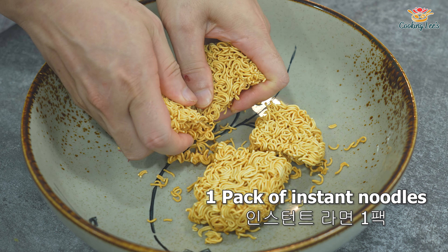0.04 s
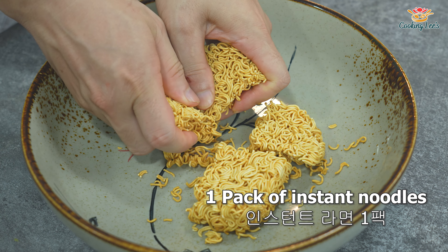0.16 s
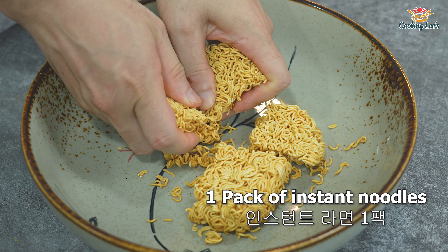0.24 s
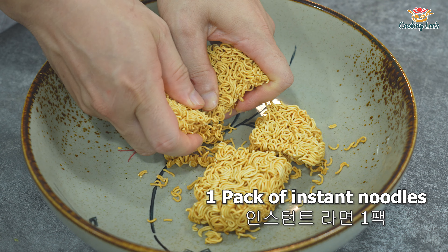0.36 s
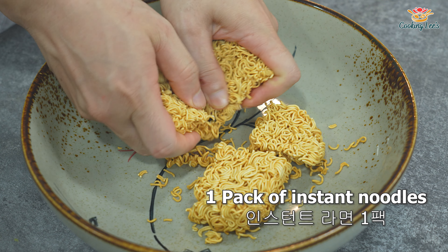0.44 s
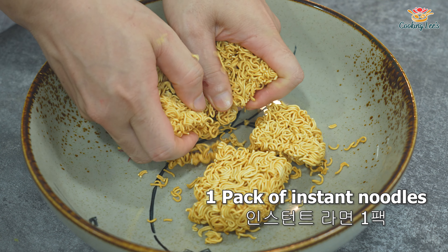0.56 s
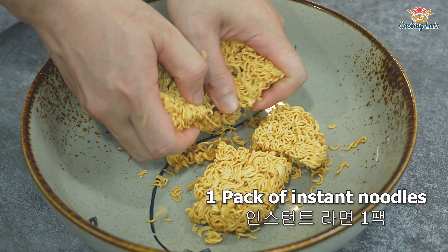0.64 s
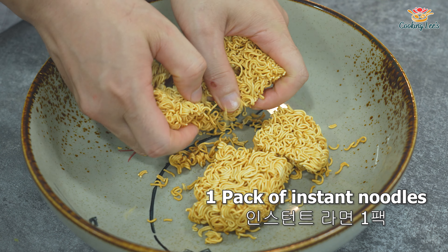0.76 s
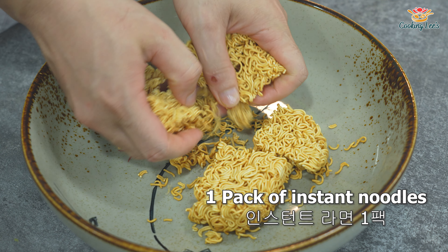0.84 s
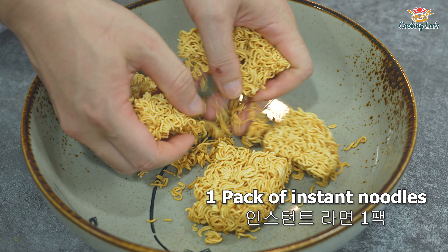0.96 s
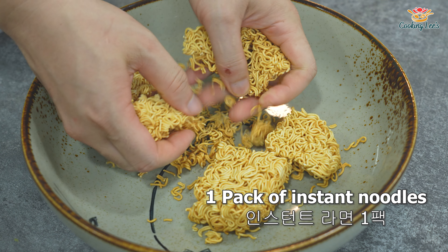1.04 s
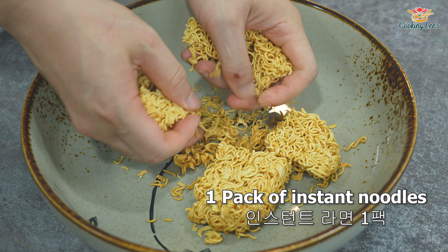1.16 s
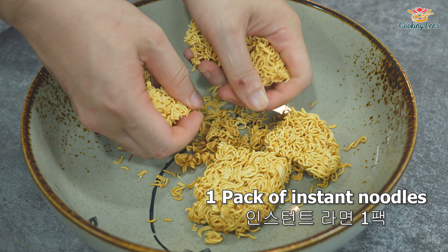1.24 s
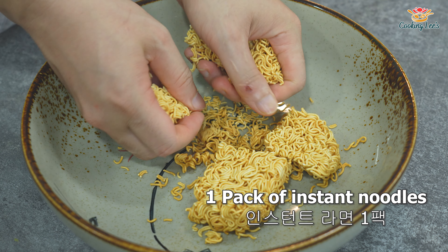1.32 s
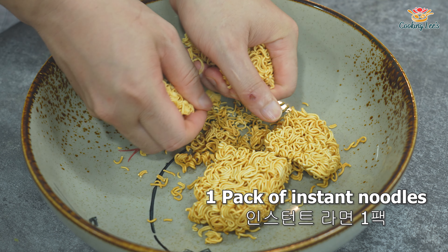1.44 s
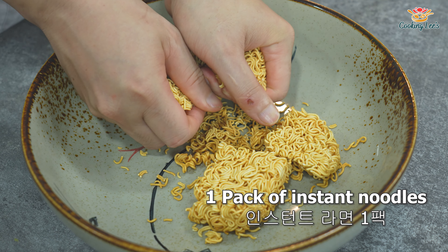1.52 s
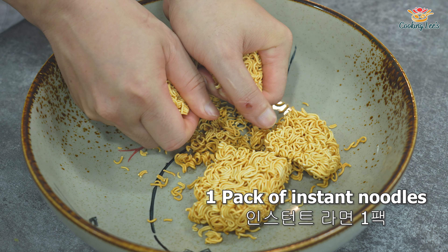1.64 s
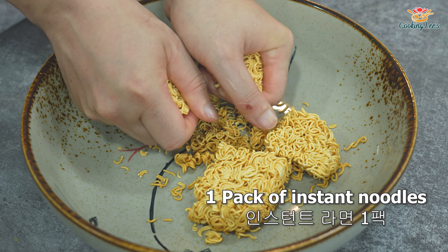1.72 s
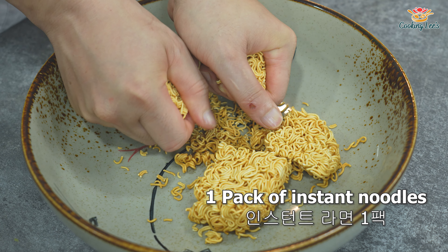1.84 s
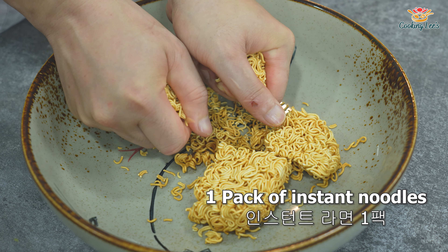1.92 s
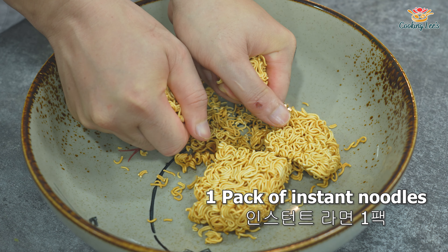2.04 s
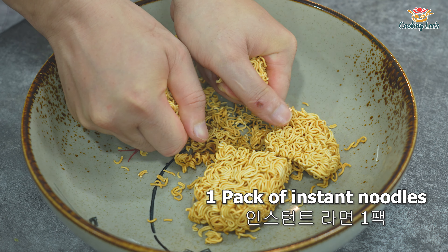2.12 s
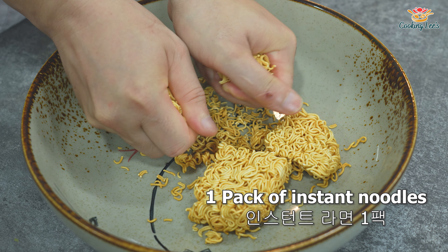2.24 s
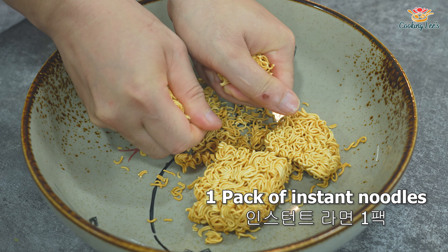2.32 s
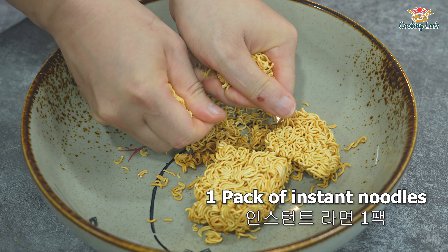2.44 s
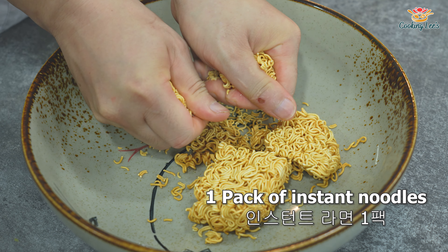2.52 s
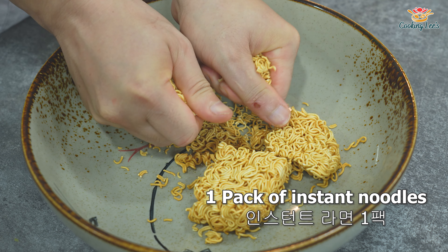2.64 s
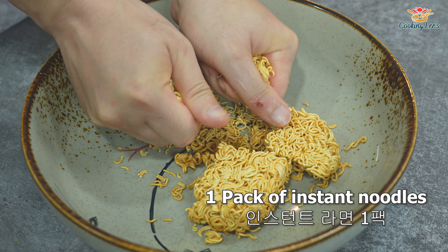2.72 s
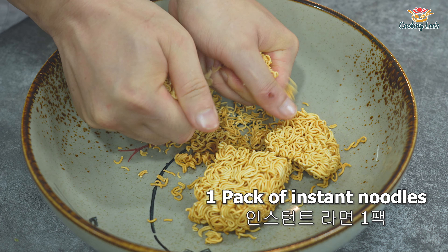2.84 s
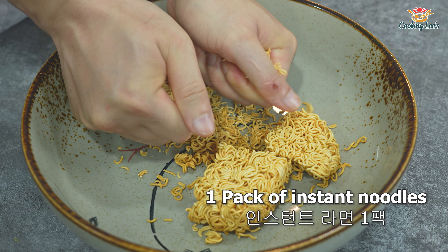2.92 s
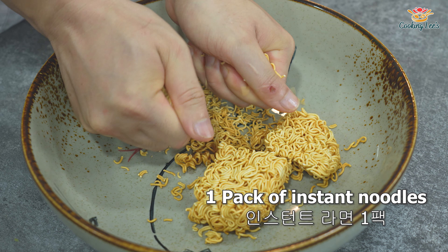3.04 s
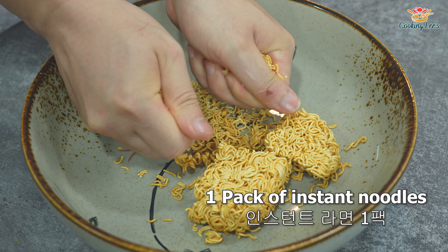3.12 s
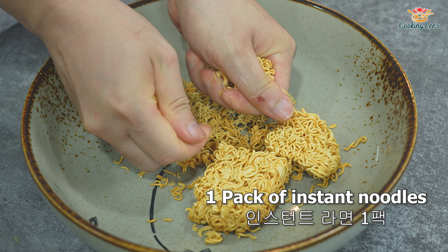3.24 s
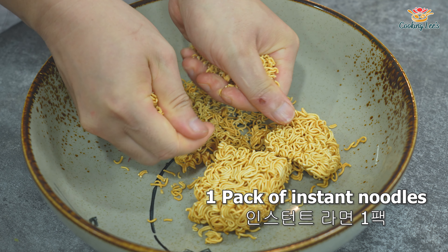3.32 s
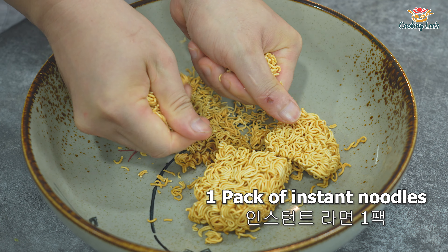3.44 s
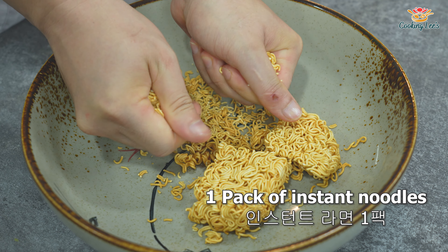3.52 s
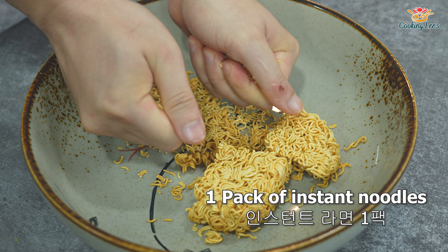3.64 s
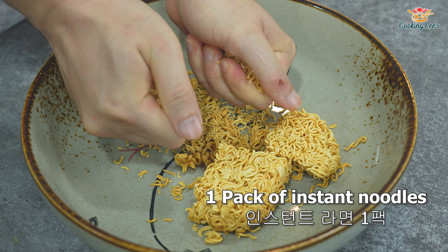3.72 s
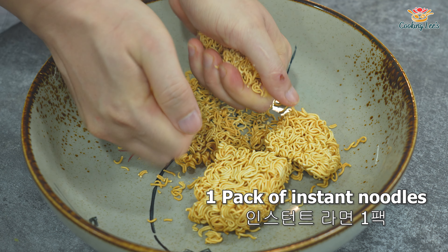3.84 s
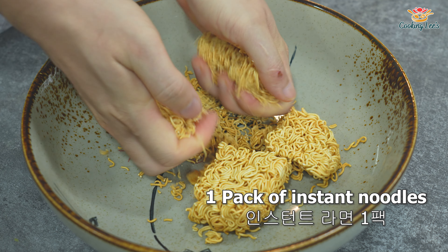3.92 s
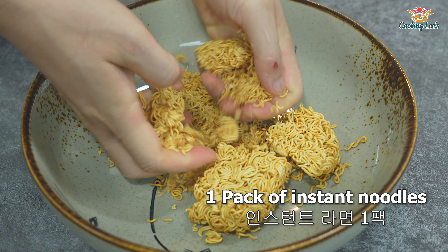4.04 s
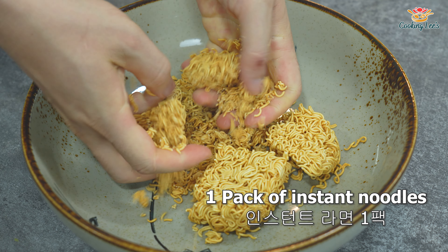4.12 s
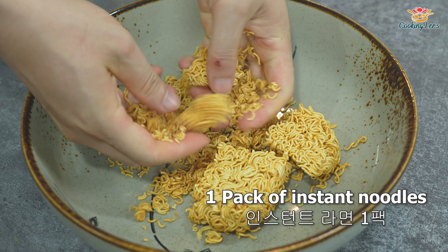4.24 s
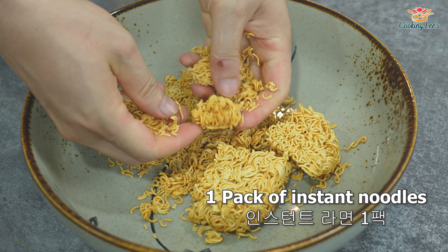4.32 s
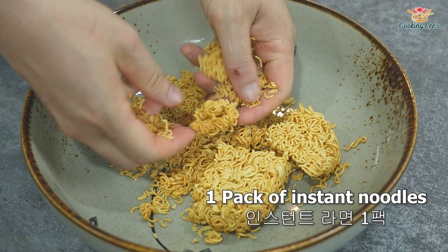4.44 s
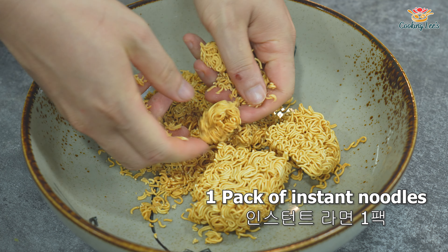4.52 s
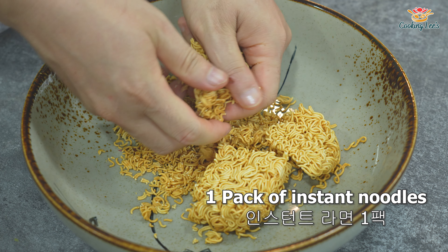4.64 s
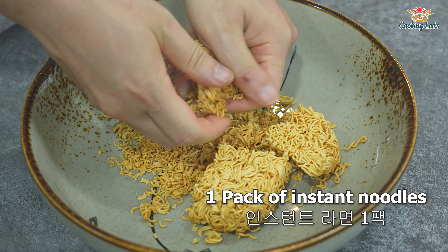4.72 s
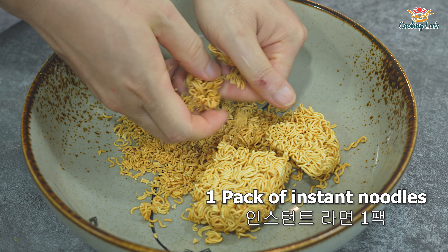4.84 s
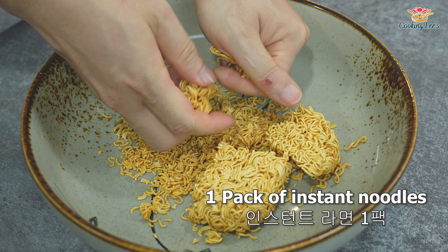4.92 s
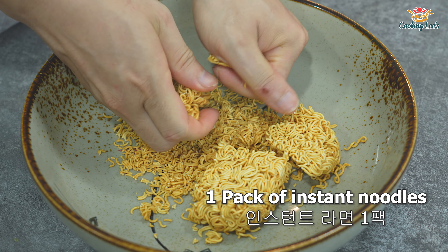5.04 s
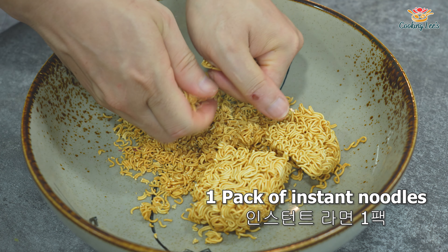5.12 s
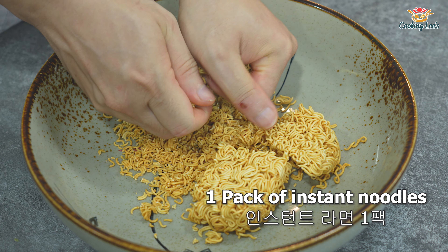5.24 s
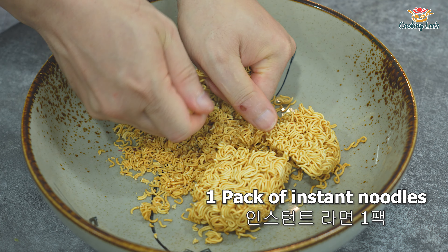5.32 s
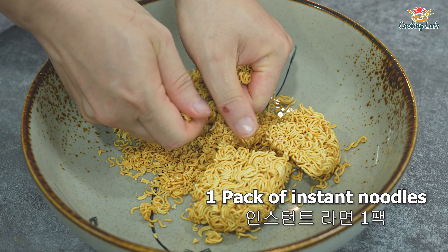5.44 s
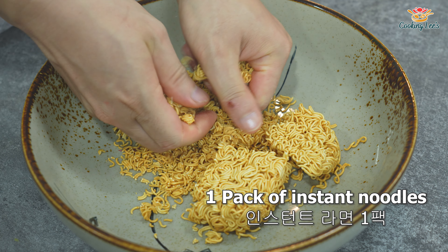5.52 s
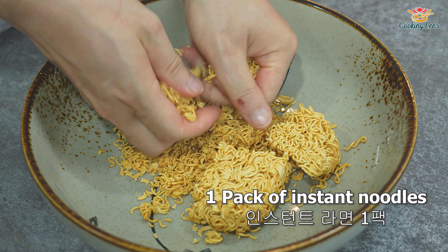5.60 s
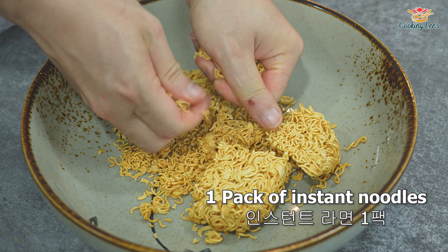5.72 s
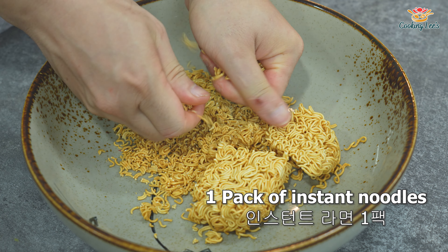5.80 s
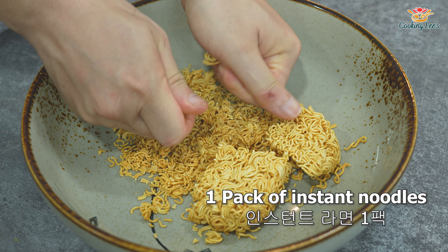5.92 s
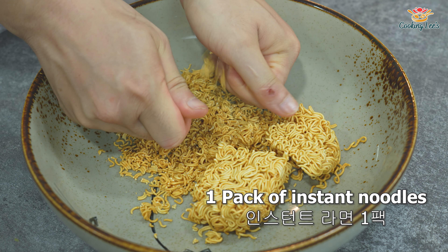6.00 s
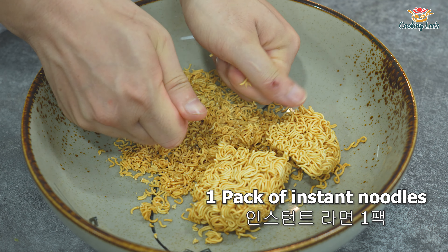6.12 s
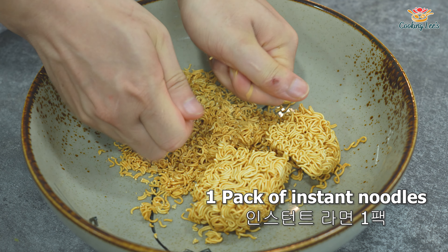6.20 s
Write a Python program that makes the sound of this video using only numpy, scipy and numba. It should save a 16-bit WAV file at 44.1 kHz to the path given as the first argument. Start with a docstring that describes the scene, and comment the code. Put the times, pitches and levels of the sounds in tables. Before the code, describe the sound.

A close microphone in a small kitchen hears hands crushing dry noodles over a ceramic bowl. At 0 s a soft bump comes with bright, sharp snaps and scattered crumbs, crackling until about 0.55 s. From 0.6 to 1.2 s it is sparser: small pieces clink on the bowl, clearest at 0.95 and 1.13 s, with a dull bump at 0.9 s. Crunching resumes near 1.25 s, thickening from 1.6 s into rapid, hollow, fist-muffled squeezes with irregular loud cracks, the strongest at 3.6 s. At 3.95 s a hard, short knock of bowl on counter rings low while crumbs spill. From 4.1 to 4.9 s only thin rustle, ticking crumbs and faint crackles remain. Crunching returns around 5 s, with a sharp snap at 5.35 s, a faint low thump at 5.65 s, and dense, brittle crushing from 5.75 s, still going at 6.3 s.

```python
"""First comes a soft bump with bright snaps: two hands crush dry instant noodles over a wide ceramic bowl, up close.
Strands break in avalanches of noise grains, coloured bright in the open air and hollow by the resonances of the fists.
Falling crumbs and larger pieces excite the decaying modes of the bowl, and loose strands hiss throughout.
The hands bump the bowl against the counter and lean on it, which sounds the counter's low modes in a small kitchen."""
import sys
import numpy as np
from scipy import signal
from scipy.fft import rfft, irfft
from scipy.io import wavfile
from scipy.ndimage import uniform_filter1d, minimum_filter1d
from numba import njit

SR = 44100
rng = np.random.default_rng(int(sys.argv[2]) if len(sys.argv) > 2 else 0)


def unload_wav(signal):
    """Save mono or channel-first audio to the path in sys.argv[1] as 16-bit WAV at rate SR, clipped to [-1, 1]."""
    wavfile.write(
        sys.argv[1],
        SR,
        np.round(np.clip(np.atleast_2d(signal).T, -1, 1) * 32767).astype(np.int16),
    )


N = 276507


def undb(db):
    """Level to amplitude: 20 dB is a factor of ten."""
    return 10 ** (np.asarray(db) / 20)


def curves(table):
    """Linear interpolation: each column after the time becomes one value per sample."""
    s, *columns = np.transpose(table)
    return [np.interp(np.arange(N) / SR, s, column) for column in columns]


def unit(x):
    """Power normalisation: scale to rms 1."""
    return x / np.sqrt(np.mean(x ** 2) + 1e-20)


def even(x, size):
    """Short-time power normalisation: rms 1 over every stretch of size samples, keeping the finer grain."""
    power = uniform_filter1d(uniform_filter1d(x ** 2, size), size)
    return x / np.sqrt(np.abs(power) + 1e-12)


def add(track, s, sound):
    """Superposition: mix a sound into a track at a time in seconds."""
    i = int(np.clip(s * SR, 0, N - 1))
    track[i:i + len(sound)] += sound[:N - i]


def fade(t, t60):
    """Exponential decay of a damped system: 60 dB down after t60 seconds."""
    return np.exp(-np.log(1000) * t / t60)


def damped_mode(t, hz, t60):
    """Free vibration of one mode: a sine that decays exponentially."""
    return np.sin(2 * np.pi * hz * t) * fade(t, t60)


def passband(x, hz, kind, order=2):
    """Butterworth filter: a maximally flat passband."""
    return signal.sosfilt(signal.butter(order, hz, kind, fs=SR, output="sos"), x)


def colour(x, points, size=1024):
    """Minimum-phase filter of unit power: the cepstrum turns (Hz, dB) points into a causal response."""
    hz, db = np.transpose(points)
    bins = np.maximum(np.fft.rfftfreq(size, 1 / SR), 1)
    magnitude = undb(np.interp(np.log(bins), np.log(hz), db))
    cepstrum = irfft(np.log(magnitude))
    causal_cepstrum = np.r_[0, 2 * cepstrum[1:size // 2]]
    response = irfft(np.exp(rfft(causal_cepstrum, size)))
    return signal.fftconvolve(x, response / np.linalg.norm(response))[:N]


@njit
def resonance(x, hz, width):
    """Second-order resonator: a state-variable band-pass whose centre may move."""
    y, band, low = np.empty(len(x)), 0., 0.
    for i in range(len(x)):
        g, damping = np.tan(np.pi * hz[i] / SR), width / hz[i]
        v = (band + g * (x[i] - low)) / (1 + g * (g + damping))
        band, low, y[i] = 2 * v - band, low + 2 * g * v, damping * v
    return y


def clicks(rate, spread_db):
    """Poisson-like impacts: impulses at random moments (rate per second), their levels spread normally."""
    happens = rng.random(N) < rate / SR
    return happens * undb(spread_db * np.clip(rng.standard_normal(N), -2, 2))


def efforts(table, attack_s, release_s, rest_db):
    """Envelope of a row of movements: each builds, holds and dies away exponentially, over a resting level."""
    t, gain = np.arange(N) / SR, np.full(N, undb(rest_db))
    for s, length, db in table:
        build = np.clip((t - s) / attack_s + .5, 0, 1)
        release = np.exp(-np.maximum(t - s - length, 0) / release_s)
        gain = np.maximum(gain, undb(db) * build * release)
    return gain


def kitchen(x, wet_db=-16, dull_hz=6000, t60=.27):
    """Diffuse reverberation: convolution with decaying noise adds the soft reflections of a small room."""
    t = np.arange(SR // 2) / SR
    reflections = rng.standard_normal(len(t)) * fade(t, t60) * (t > .005)
    tail = passband(reflections, dull_hz, "lowpass", order=1)
    return x + undb(wet_db) * signal.fftconvolve(x, tail / np.linalg.norm(tail))[:N]


# the hands lean on the bowl and the counter rumbles: (start [s], length [s], level [dB])
LEANS = [(0, 0.28, -60), (3.2, 1, -66), (4.2, 0.39, -61), (5.12, .45, -72), (5.62, 0.12, -55.5),
         (5.8, 0.27, -65)]
# the weight comes on and off; the counter is never quite still
LEAN_S, LIFT_S, STILL_DB = 0.045, 0.045, -99
# modes of the counter under the bowl, for rumble and bumps: (frequency [Hz], level [dB], t60 [s])
COUNTER_MODES = [(68.3, -23, 0.45), (121.4, -4.5, 0.31), (181, -3.5, 0.55), (298, -10.5, 0.56),
                 (453, -11.5, 0.27), (502, -8.5, 0.29), (670, -18, 0.95), (786, -14.5, 0.68),
                 (910, -12.5, 0.42)]


def rumble(width_hz=20.0):
    """Forced vibration: shifting pressure, as noise, stirs the lowest mode of the counter."""
    hz = np.full(N, 1. * COUNTER_MODES[0][0])
    sway = resonance(rng.standard_normal(N), hz, width_hz)
    sway = resonance(sway, hz, width_hz)
    return even(sway, size=6000) * efforts(LEANS, LEAN_S, LIFT_S, STILL_DB)


# the bowl is bumped against the counter:
# (time [s], level [dB], brightness as low-pass cutoff [Hz], softness of the push [s])
BUMPS = [(0.0, -23.5, 800, 0.0015), (0.671, -46, 500, 0.012), (0.889, -24, 1100, 0.0058),
         (1.387, -35.5, 152, 0.015), (3.948, -11, 740, 0.00042), (3.954, -30, 402, 0.00074),
         (4.451, -39.5, 142, 0.011), (5.173, -50, 300, .005), (5.656, -27, 140, 0.011)]


def bumps(thud_hz=175, thud_t60=0.013, knock_hz=580, knock_t60=0.016, knock_db=-5,
          ring_db=-14, boom_db=-24, boom_t60=0.69, lowest_hz=60):
    """Impact excitation: a dull thud and short knock, the counter's modes, and the low boom of the kitchen."""
    t, out = np.arange(SR) / SR, np.zeros(N)
    thud = damped_mode(t, thud_hz, thud_t60)
    knock = undb(knock_db) * damped_mode(t, knock_hz, knock_t60)
    # neighbouring modes start in opposite phase
    ring = sum((-1) ** k * undb(db) * damped_mode(t, hz, t60)
               for k, (hz, db, t60) in enumerate(COUNTER_MODES))
    for s, db, bright_hz, soft_s in BUMPS:
        boom_noise = passband(rng.standard_normal(SR), [125, 380], "bandpass", order=1)
        boom = unit(boom_noise) * fade(t, boom_t60)
        push = 1 - np.exp(-t / soft_s)
        blow = (thud + knock + undb(ring_db) * ring + undb(boom_db) * boom) * push
        add(out, s, undb(db) * passband(blow, bright_hz, "lowpass"))
    return passband(out, lowest_hz, "highpass", order=3)


# modes of the loaded bowl, for crumbs and clinks: (frequency [Hz], level [dB], t60 [s])
BOWL_MODES = [(2140, 0, .12), (2215, -5, .06), (3535, -1, .14), (3620, -10, .06), (5095, -16, .18),
              (5695, -12, .15), (6870, -14, .18), (7675, -11, .15), (9160, -14, .15), (9620, -12, .1),
              (10220, -16, .12), (11120, -12, .13), (13950, -14, .05)]
# the handful drops; from then on it smothers the second pair of the bowl's modes
HEAP_S, SMOTHER_DB = 3.95, -6
# colour of a crumb landing: (frequency [Hz], level [dB])
TICK_COLOUR = [(300, -54), (800, -8), (1100, -22), (1800, 0.5), (2300, 12), (2700, 2.5), (3050, -7),
               (4300, -25), (7000, -41), (12000, -25), (15500, -3)]
# spills of crumbs onto the glaze: (start [s], length [s], level [dB])
SPILLS = [(0, 0.011, -35.5), (.15, 0.14, -35.5), (.61, 0.39, -38.5), (.96, 0.13, -37), (1.13, 0.083, -36),
          (2.8, 1.1, -40), (3.95, .2, -33.5), (4.15, .12, -38), (4.44, 0.11, -41.5), (4.65, 0.031, -40),
          (4.85, 0.053, -37.5), (5.5, 0.89, -40.5)]
# a spill builds and trickles out; stray crumbs fall all the time
POUR_S, TRICKLE_S, STRAY_DB = 0.012, 0.051, -44


def crumbs(rate=170, spread_db=6, tick_db=-4):
    """Modal excitation by position: each crumb ticks and, on another spot of the bowl, weights the modes anew."""
    t = np.arange(SR // 3) / SR
    hits, ring = clicks(rate, spread_db), 0
    smothered_db = SMOTHER_DB * (np.arange(N) / SR > HEAP_S)
    for k, (hz, db, t60) in enumerate(BOWL_MODES):
        mode_db = db + smothered_db * (k // 2 == 1)
        strikes = hits * rng.standard_normal(N)
        mode_ring = signal.fftconvolve(strikes, damped_mode(t, hz, t60))[:N]
        ring = ring + undb(mode_db) * even(mode_ring, size=3000)
    # many further crumbs tick without a ring
    ticks = colour(even(hits + clicks(4 * rate, spread_db), size=1500), TICK_COLOUR)
    # the stiff glaze radiates little below its lowest mode
    patter = passband(unit(ring) + undb(tick_db) * ticks, 1150, "highpass", order=3)
    return patter * efforts(SPILLS, POUR_S, TRICKLE_S, STRAY_DB)


# larger pieces hit the bowl, which a hand damps:
# (time [s], relative peak level [dB], upper pair of modes against the lower [dB])
CLINKS = [(0.1075, -24, -4), (0.1935, -20, -4), (0.5958, -23, -13), (0.603, -20, -15), (0.6698, -25, -4),
          (0.7147, -23, -10), (0.9522, -6, -23), (1.1285, -9, -12), (1.1625, -17, -12), (1.1802, -14, -16)]


def clinks(damped_t60=0.07, stiffen=1.014, second_db=-15, lowest_hz=1550, tap_db=1.0):
    """Damped modal ring: hard taps near a holding hand sound the two lowest pairs of modes, raised and short."""
    t, out = np.arange(SR // 5) / SR, np.zeros(N)
    low, low_twin, high, high_twin = (np.sin(2 * np.pi * hz * stiffen * t) for hz, _, _ in BOWL_MODES[:4])
    lower_pair = low + undb(second_db) * low_twin
    upper_pair = high + undb(second_db) * high_twin
    for s, db, upper_db in CLINKS:
        ring = lower_pair + undb(upper_db) * upper_pair
        add(out, s, undb(db + tap_db) * ring / np.abs(ring).max() * fade(t, damped_t60))
    return passband(out, lowest_hz, "highpass", order=5)


def crackle(rate=600, spread_db=2.5, avalanche_s=0.0019, rub=0.054, flurry_db=2.5):
    """Avalanche noise: small fractures, each a short run of grains, come in flurries over the rub of strands."""
    t = np.arange(SR // 50) / SR
    avalanche_power = np.exp(-2 * t / avalanche_s)
    power = signal.fftconvolve(clicks(rate, spread_db) ** 2, avalanche_power)[:N]
    strength = even(np.sqrt(np.abs(power)) + 1e-4, size=900) + rub
    flurry = unit(uniform_filter1d(rng.standard_normal(N), size=900))
    grains = even(strength * rng.standard_normal(N), size=800)
    return grains * unit(undb(flurry_db * flurry))


# colour of a breaking strand in the open, for rustle and noodles: (frequency [Hz], level [dB])
CRACK_COLOUR = [(250, -63), (420, -27.5), (600, -11.5), (830, -15.5), (1000, -18), (1180, -2.5), (1450, -5),
                (1900, -20), (2600, 2), (3700, 3), (4500, -2.5), (7000, 1.5), (11000, 1.5), (15500, 0)]


def rustle(level_db=-43.0, lowest_hz=3800):
    """Friction noise: loose strands slide over each other and the skin all the time, a thin hiss of tiny grains."""
    grains = colour(crackle(rate=500, spread_db=8.5, rub=.15, flurry_db=3.0), CRACK_COLOUR)
    return undb(level_db) * passband(grains, lowest_hz, "highpass")


def shares(closure_db):
    """Energy conservation: split a crack between the open air and the inside of the fist."""
    ratio = undb(closure_db)
    return np.array([np.ones_like(ratio), ratio]) / np.hypot(1, ratio)


def lesser_snaps(effort, count=240, length_s=0.0035, length_spread=0.51, over_db=3.5, spread_db=2.5,
                 depth_spread_db=3):
    """Successive brittle failure: strands give way at uneven moments, as loud as the squeeze is hard."""
    when = (np.arange(count) + rng.random(count)) / count * (N - 1)
    length, size, depth = np.clip(rng.standard_normal((count, 3)), -2, 2).T
    db = 20 * np.log10(effort[when.astype(int)]) + over_db + spread_db * size
    lengths_s = length_s * np.exp(length_spread * length)
    return list(zip(when / SR, lengths_s, db, depth_spread_db * depth))  # columns as in LOUD_SNAPS


MUFFLE_PER_DEPTH = 0.73  # dB of closure gained for each dB of depth


def snaps(rows, closure_db, steep=6):
    """Brittle fracture bursts swell and die in ms; returns the open cracks, those in the fist, and their depth."""
    grains = rng.standard_normal(N)
    body = signal.butter(2, [950, 2100], "bandpass", fs=SR, output="sos")
    body_share = np.std(signal.sosfilt(body, grains))
    outside, inside, depth = np.zeros((3, N))
    for s, length, db, depth_db in rows:
        i, n = int(s * SR), max(int(length * SR), 20)
        age = np.linspace(0, steep, n)
        burst = grains[i:i + n] * (age * np.exp(-age))[:N - i]
        # the middle band of a burst sets how strongly it drives the air in the fist
        body_burst = signal.sosfilt(body, np.pad(burst, (0, n)))
        body_rms = np.linalg.norm(body_burst) / np.sqrt(n) + 1e-12
        open_gain, fist_gain = undb(db) * shares(closure_db[i] + MUFFLE_PER_DEPTH * depth_db)
        add(outside, s, open_gain * unit(burst))
        add(inside, s, fist_gain * burst * body_share / body_rms)
        depth[i:i + n] = depth_db
    return outside, inside, depth


# the cavity of the fists changes with the grip: (time [s], middle resonance [Hz], upper resonance [Hz])
GRIP = [(0, 2130, 3770), (1.55, 2245, 3900), (2.4, 2030, 3540), (2.72, 1900, 3660), (3.25, 2120, 3570),
        (3.6, 1900, 3460), (3.9, 2230, 3670), (5, 2180, 3800), (5.3, 1845, 3790), (5.63, 2290, 3740),
        (5.8, 1840, 3850), (6, 2040, 4040), (6.27, 2080, 3500)]
# how strongly the cupped hands ring, against their middle resonance:
# (time [s], deep resonances [dB], upper resonance [dB])
CUP = [(0, 7, 9.5), (1.45, -4, -7.5), (2.35, 2.5, 3), (2.7, 2.5, -2), (3.1, 3, -1), (3.35, -2.5, 5.5),
       (3.54, 3, -1), (3.83, -0.5, 1.5), (3.93, -6.5, 0.5), (5.1, -5.5, -12.5), (5.84, -8.5, -5.5),
       (5.92, -2, -1), (6.03, -8.5, -5), (6.13, -2, 1.5), (6.27, -8, -1)]
# deep resonances of the air between hands and bowl: (frequency [Hz], width [Hz], level [dB])
HOLLOW = [(554, 172, -14.5), (819.5, 303, -6), (1231, 264, 4.5), (1526, 249, 4.5)]


def fist(x, depth_db, middle_db=0, middle_width=285.0, upper_db=0, upper_width=385.0, edge_hz=4250, leak_hz=400):
    """Cavity resonance: the air in cupped hands shares a crack's energy; flesh eats treble, gaps leak bass."""
    middle_hz, upper_hz = curves(GRIP)
    cup_deep_db, cup_upper_db = curves(CUP)
    share = undb([cup_deep_db + depth_db, np.full(N, middle_db), cup_upper_db + upper_db - depth_db])
    share = share / np.linalg.norm(share, axis=0)
    to_deep, to_middle, to_upper = share * x + 1e-18
    deep = sum((-1) ** k * undb(db) * resonance(to_deep, np.full(N, 1. * hz), 1. * width)
               for k, (hz, width, db) in enumerate(HOLLOW))
    middle = resonance(to_middle, middle_hz, middle_width)
    upper = resonance(to_upper, upper_hz, upper_width)
    # each resonance gives back the power it was fed
    air = unit(deep) * np.std(to_deep) + unit(middle) * np.std(to_middle) - unit(upper) * np.std(to_upper)
    muffled = passband(air, edge_hz, "lowpass", order=4)
    muffled = passband(muffled, leak_hz, "highpass", order=4)
    return unit(muffled) * np.std(x)


# each squeeze of the fingers: (start [s], length [s], level [dB])
SQUEEZES = [(0, 0.098, -33), (.105, 0.07, -26.5), (.255, 0.019, -30), (.31, 0.23, -27.5),
            (.635, 0.084, -34), (1.09, .13, -34), (1.25, .2, -31.5), (1.475, 0.14, -28.5),
            (1.59, 0.18, -24), (1.82, 0.14, -22.5), (1.95, 0.095, -29.5), (2.065, 0.23, -25.5),
            (2.31, 0.13, -27), (2.47, 0.15, -24.5), (2.56, 0.28, -23), (2.88, 0.37, -27),
            (3.19, .14, -24.5), (3.35, 0.073, -30.5), (3.445, 0.18, -26.5), (3.675, 0.1, -27),
            (3.835, .13, -28.5), (3.99, 0.2, -36), (4.2, 0.12, -42.5), (4.39, 0.026, -35),
            (4.85, 0.09, -41), (4.98, 0.064, -36), (5.06, .08, -27), (5.175, 0.09, -26), (5.3, 0.11, -30.5),
            (5.42, 0.093, -37.5), (5.53, .2, -31.5), (5.595, 0.024, -29.5), (5.75, 0.21, -30),
            (5.925, .15, -23.5), (6.105, 0.085, -21.5), (6.23, 0.059, -28)]
# a squeeze builds and lets go; merely held, the noodles hardly crack
PRESS_S, RELAX_S, HOLD_DB = 0.0074, 0.034, -48.5
# how far the fists close round the noodles: (time [s], sound from inside the fist over the open crack [dB])
CLOSURE = [(0, -7), (.14, -22.5), (.45, -15), (.75, -12), (1.2, -13.5), (1.43, -9), (1.5, -2.5),
           (1.95, 3.5), (2.5, 1.5), (2.85, 8), (3.25, 1.5), (3.6, 7), (3.9, 4.5), (4.07, -11), (4.85, -21),
           (5.02, 1.5), (5.62, 1), (6.27, 11.5)]
# the loudest fractures:
# (time [s], length [s], level [dB], depth in the fist: deep resonances up and upper one down [dB])
LOUD_SNAPS = [(0.047, 0.0023, -16.5, -10), (.0771, 0.0033, -20, -9), (0.114, 0.0072, -21, 0),
              (0.1283, 0.025, -22.5, 0), (0.2666, 0.005, -22, 2), (0.3186, 0.0027, -29, -7),
              (0.358, 0.0028, -21.5, -6), (0.3783, 0.0027, -19, -3), (0.417, 0.0026, -24.5, 4),
              (0.4446, 0.0085, -15, -4), (0.639, 0.0016, -23.5, -7), (0.681, .004, -21, 1.5),
              (1.294, .0025, -20, -3), (1.3354, 0.0083, -23.5, 0), (1.3747, 0.0069, -22, -1),
              (1.4157, 0.0058, -22, -3), (1.444, 0.0053, -24.5, 1), (1.4787, 0.0056, -20, -1),
              (1.4949, 0.0047, -19, -2), (1.523, 0.014, -26, 3.5), (1.5594, 0.0063, -19, -7),
              (1.771, .005, -13.5, -0.5), (1.8166, 0.0063, -20, -3.5), (1.8426, 0.0039, -17, -2),
              (1.868, .005, -22.5, 1), (2.0186, 0.0018, -14.5, 6.5), (2.072, 0.002, -12.5, 2.5),
              (2.1233, 0.0036, -16, 1), (2.201, 0.0029, -13.5, -0.5), (2.2188, 0.0034, -16.5, 2),
              (2.264, 0.0084, -14, -1), (2.372, 0.002, -13, 0), (2.4123, 0.0042, -17.5, 2.5),
              (2.5727, 0.0046, -13.5, 3.5), (2.589, 0.0021, -24, 8), (2.6366, 0.0043, -13, -4),
              (2.7365, 0.0072, -17, -2), (2.747, 0.0012, -19, 10), (2.7715, 0.0043, -20, -2),
              (2.819, 0.0072, -18, 0.5), (2.847, 0.0039, -18, -3.5), (2.9268, 0.0026, -13, -4),
              (2.988, 0.0024, -24, -4), (3.1277, 0.0048, -20.5, 3), (3.2815, 0.0018, -25, -5),
              (3.445, 0.0033, -19.5, 1), (3.5966, 0.0019, -7, 3), (3.601, 0.0023, -25, -5),
              (3.619, 0.0027, -17, 7), (3.6862, 0.0038, -18.5, 2), (3.721, 0.0028, -19, 4),
              (3.7645, 0.0024, -20.5, -1), (3.8314, 0.0051, -19, 3.5), (3.8657, 0.0022, -24.5, -7),
              (3.9145, 0.0025, -22.5, -3), (3.946, 0.027, -24.5, 0), (4.92, 0.0025, -33, 8),
              (5.009, 0.0043, -27, 0.5), (5.0873, 0.0033, -20, 5.5), (5.204, .01, -28, -3),
              (5.2126, 0.0025, -18, 5.5), (5.2557, 0.011, -21.5, 0), (5.3493, 0.0033, -12, 3.5),
              (5.3662, .002, -16, 2), (5.3713, .002, -18.5, 6), (5.6119, 0.0097, -20, -0.5),
              (5.7066, 0.0038, -20.5, 2), (5.7497, 0.0027, -19, 11), (5.759, 0.0022, -19.5, -1),
              (5.7946, 0.0025, -15, 5), (5.8318, 0.0047, -17, 10.5), (5.8532, 0.0042, -18, 13),
              (5.89, 0.005, -21, 6.5), (5.995, 0.0039, -17, 2), (6.0117, 0.0042, -12, -0.5),
              (6.0476, 0.0037, -26, -2), (6.162, 0.002, -24, 2), (6.171, 0.0081, -27, 3),
              (6.2084, .01, -22, 2)]


def noodles(open_db=1.5, fist_db=-1, snap_open_db=0, snap_fist_db=0.0):
    """Two transmission paths: fine crackle and big snaps, heard directly and through the fists."""
    effort = efforts(SQUEEZES, PRESS_S, RELAX_S, HOLD_DB)
    closure_db = curves(CLOSURE)[0]
    fine_outside, fine_inside = crackle() * effort * shares(closure_db)
    outside, inside, depth_db = snaps(lesser_snaps(effort) + LOUD_SNAPS, closure_db)
    bright = colour(undb(open_db) * fine_outside + undb(snap_open_db) * outside, CRACK_COLOUR)
    hollow = fist(undb(fist_db) * fine_inside + undb(snap_fist_db) * inside, depth_db)
    return bright + hollow


def scene(smallest_hz=300):
    """Superposition of sources in the room: the small, light ones radiate little bass."""
    small = noodles() + rustle() + crumbs() + clinks()
    small = passband(small, smallest_hz, "highpass", order=4)
    return (kitchen(small) + bumps() + rumble())[None]


def record(dry, ceiling=.5, top_hz=15850):
    """Look-ahead limiting and band limiting: the recorder turns down the tallest peaks and cuts the top."""
    room_left = ceiling / np.maximum(np.abs(dry), ceiling)
    gain = uniform_filter1d(minimum_filter1d(room_left, size=161), size=161)
    top_cut = signal.ellip(10, .1, 80, top_hz, fs=SR, output="sos")
    return signal.sosfilt(top_cut, dry * gain)


dry = scene()
out = record(dry)
unload_wav(out)
```